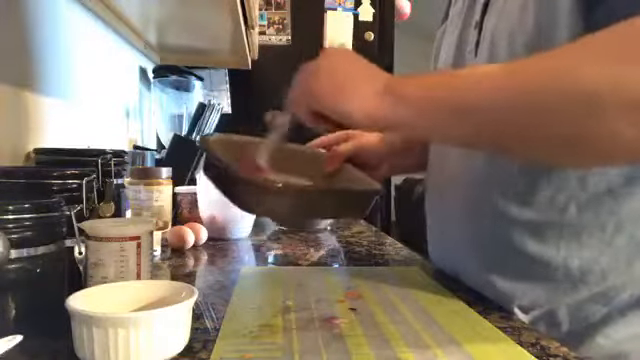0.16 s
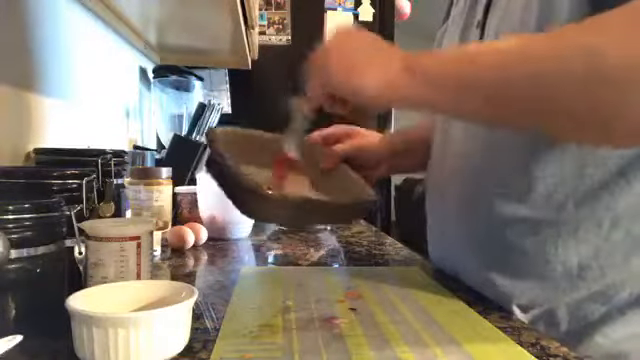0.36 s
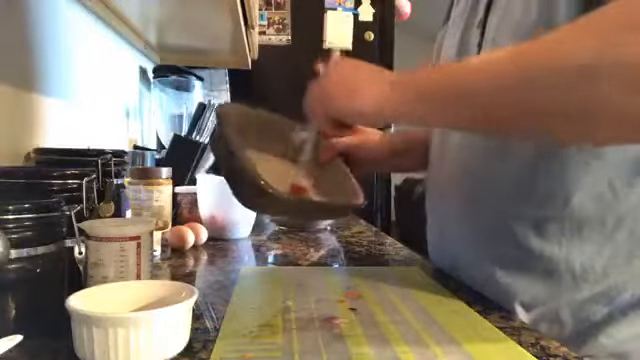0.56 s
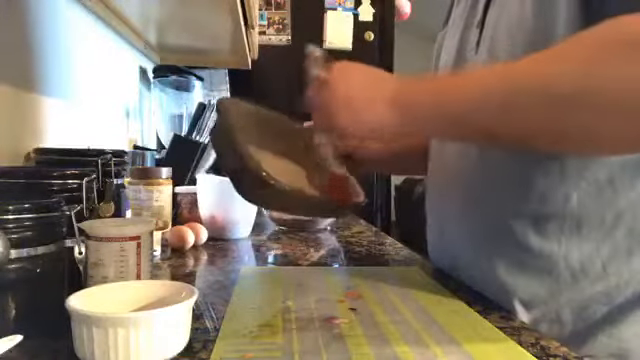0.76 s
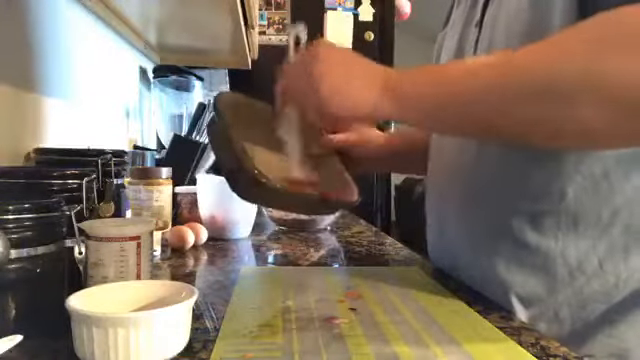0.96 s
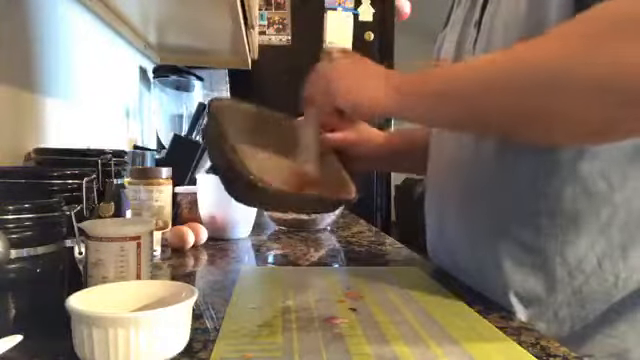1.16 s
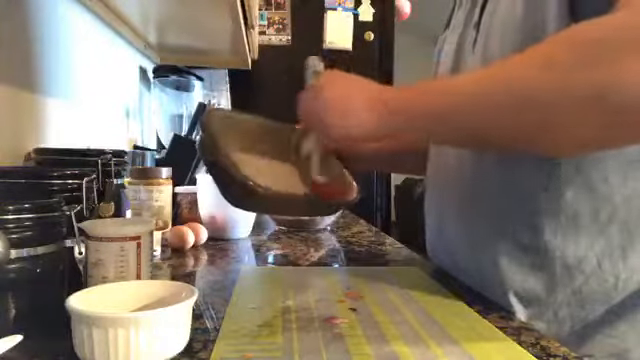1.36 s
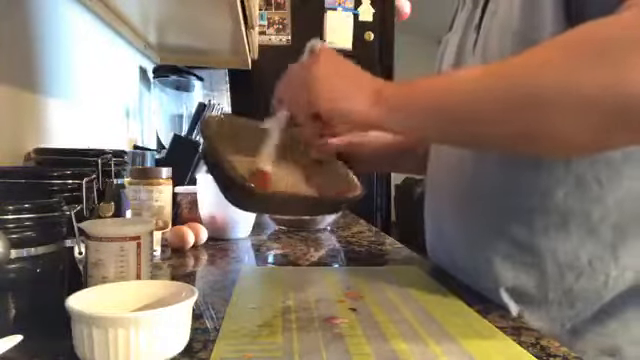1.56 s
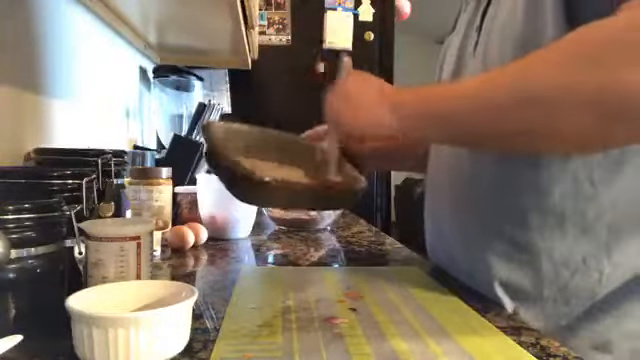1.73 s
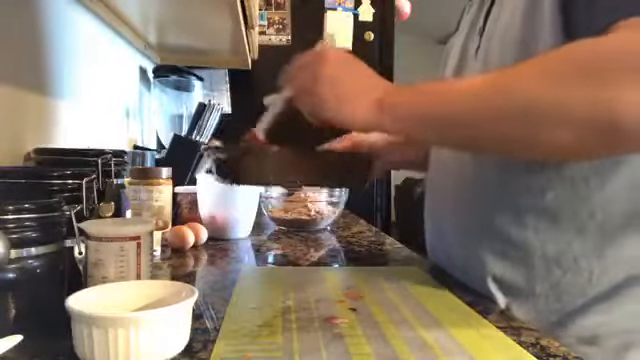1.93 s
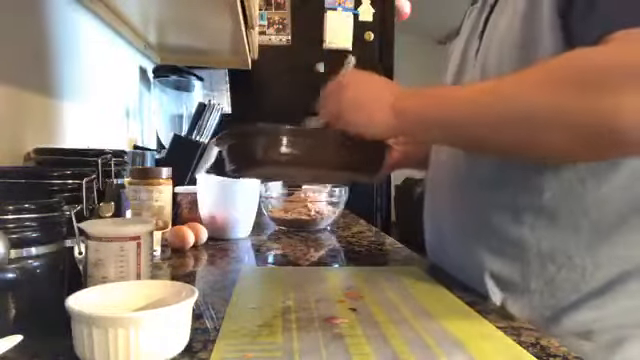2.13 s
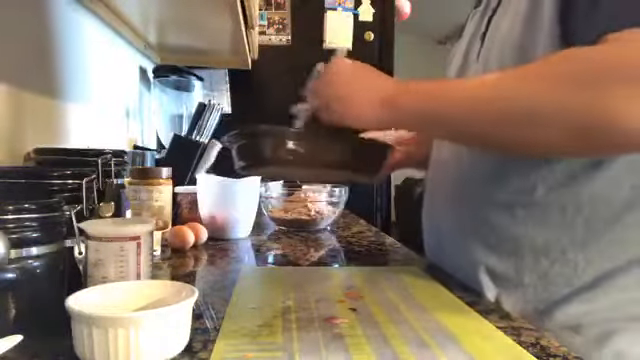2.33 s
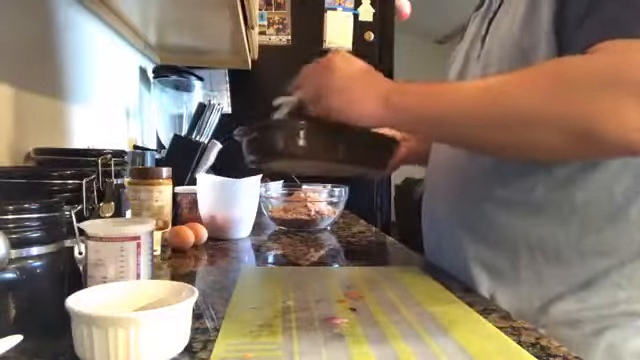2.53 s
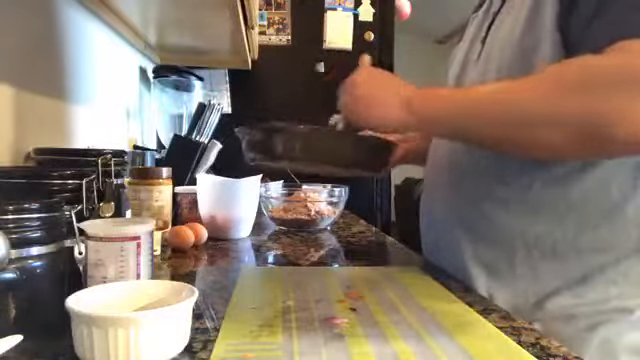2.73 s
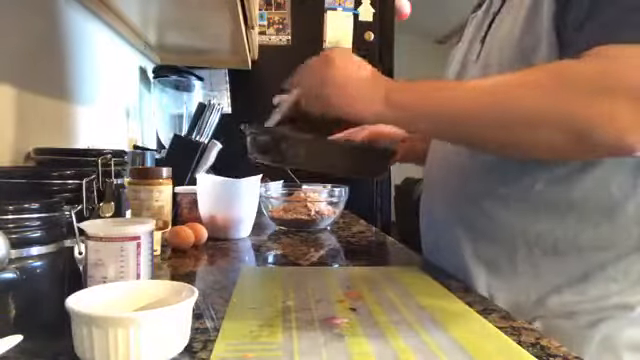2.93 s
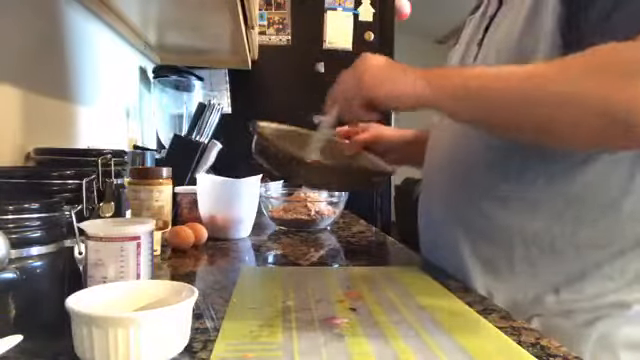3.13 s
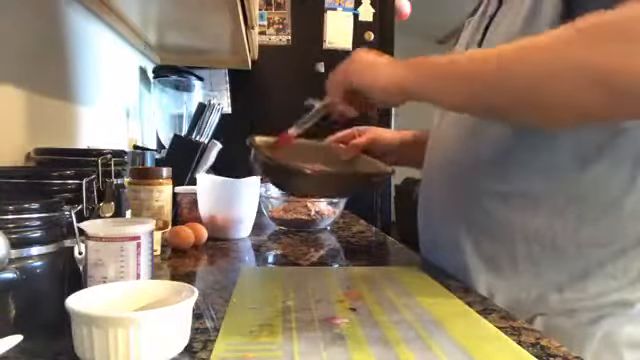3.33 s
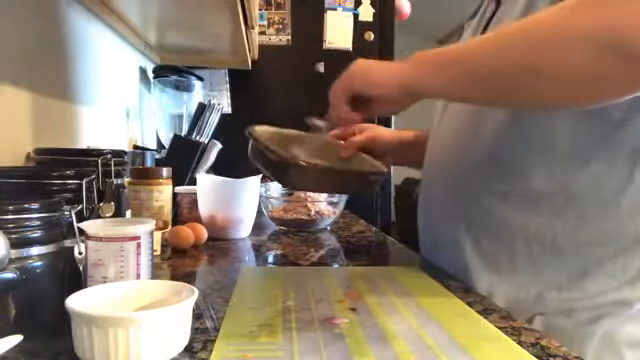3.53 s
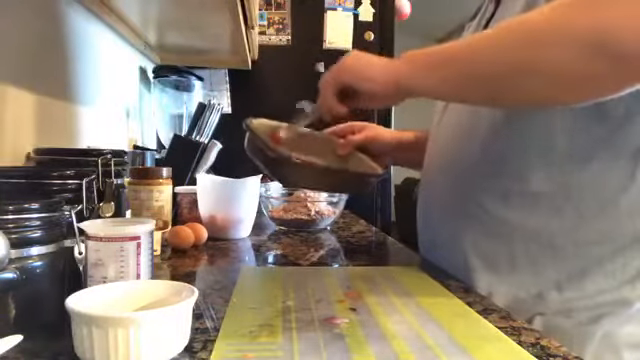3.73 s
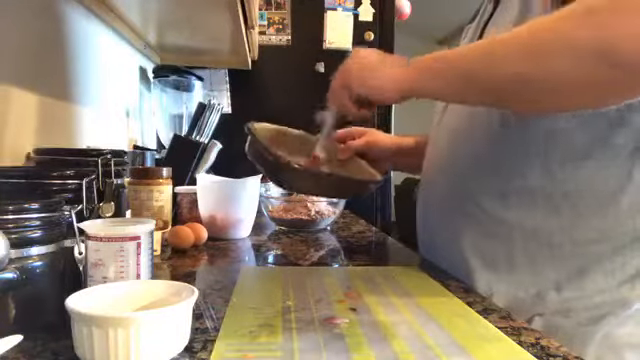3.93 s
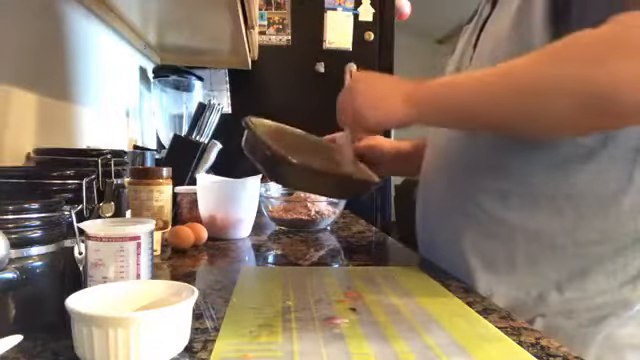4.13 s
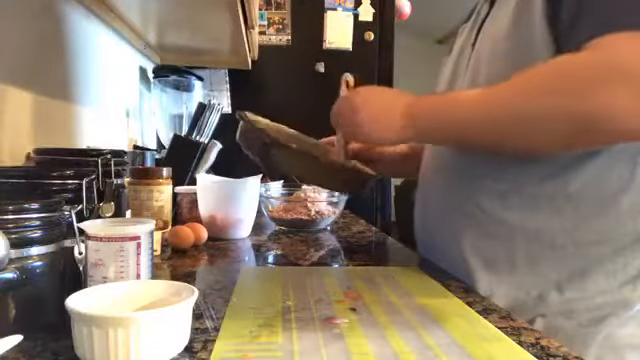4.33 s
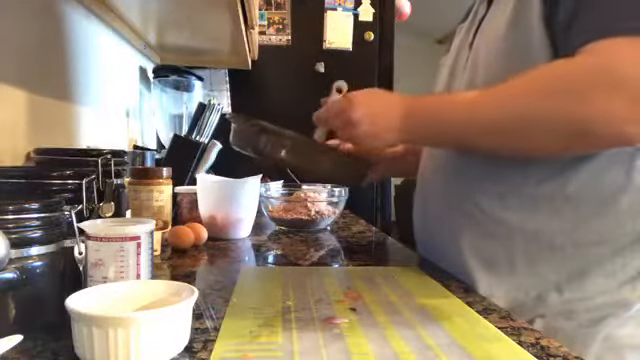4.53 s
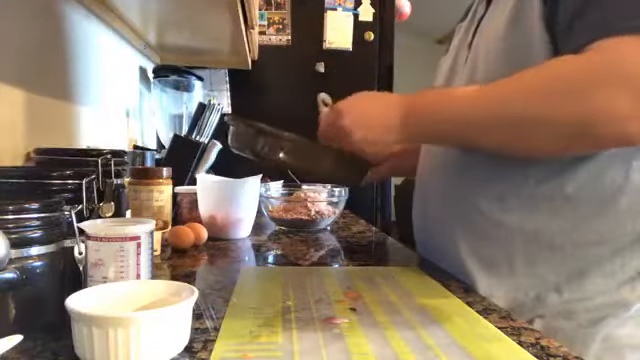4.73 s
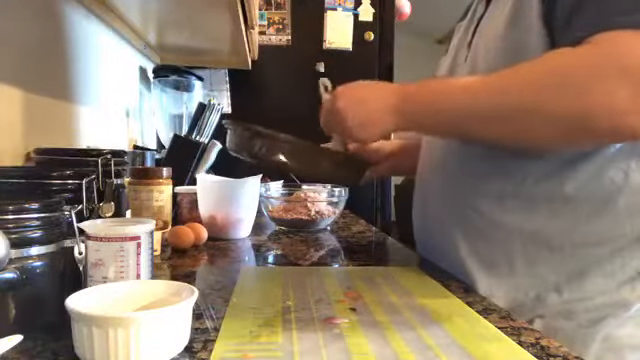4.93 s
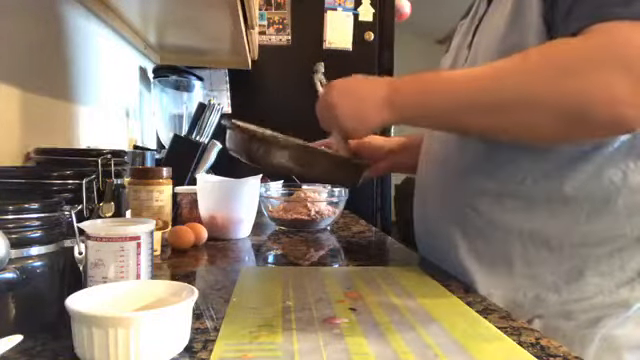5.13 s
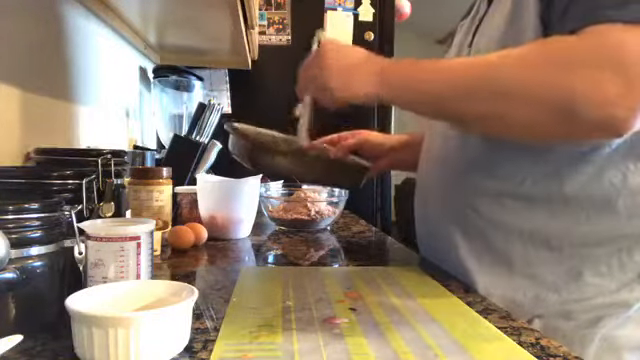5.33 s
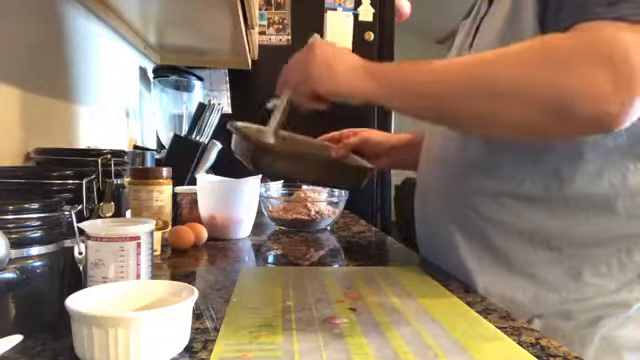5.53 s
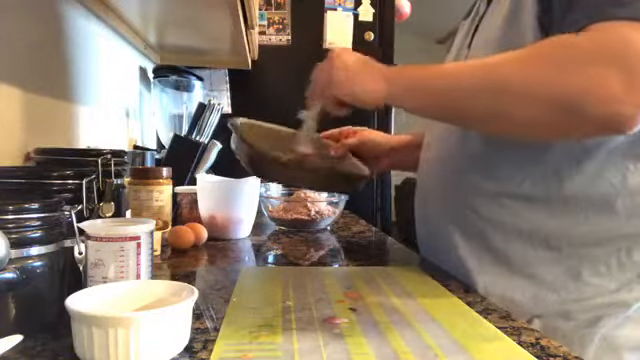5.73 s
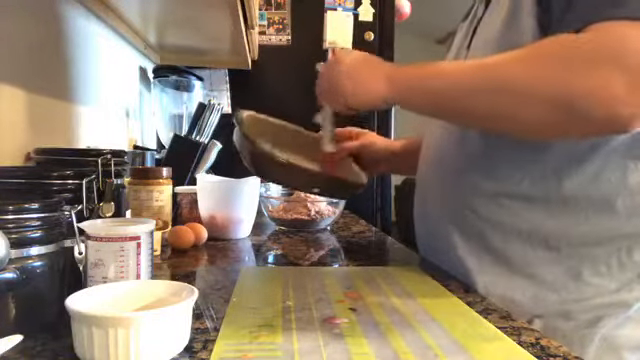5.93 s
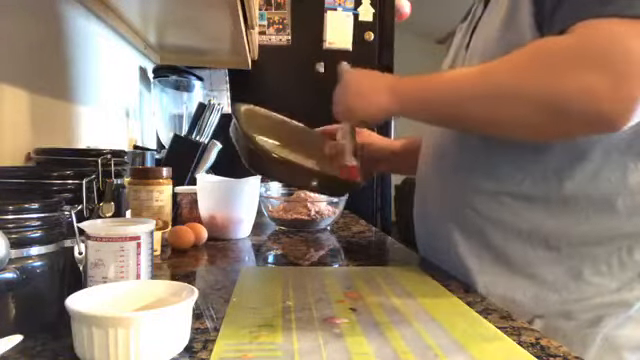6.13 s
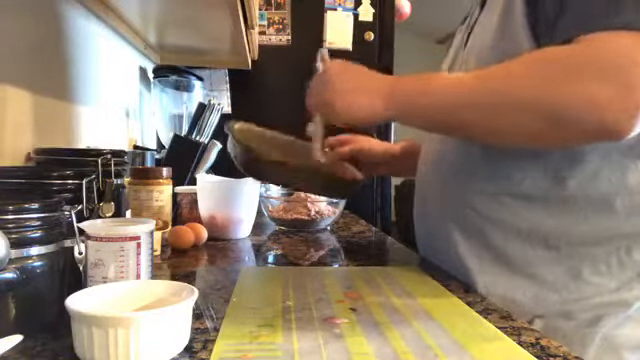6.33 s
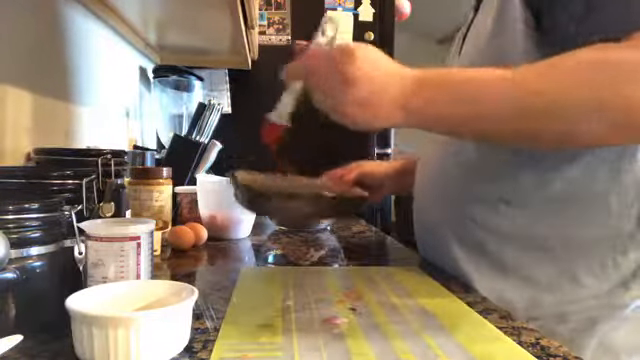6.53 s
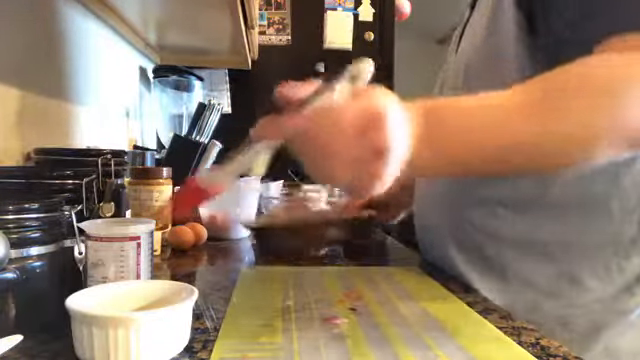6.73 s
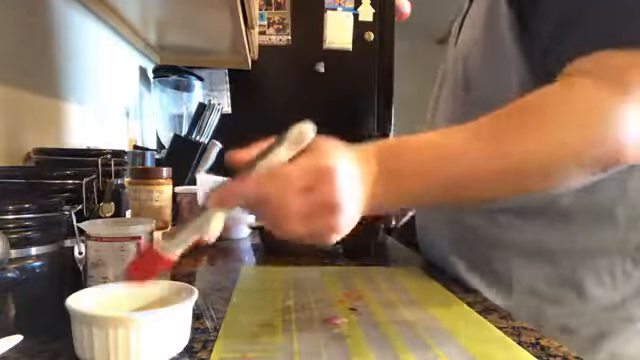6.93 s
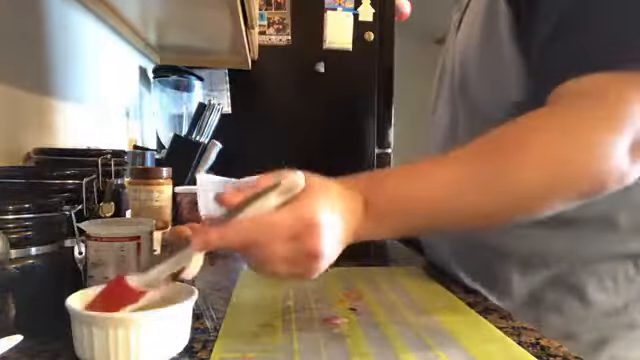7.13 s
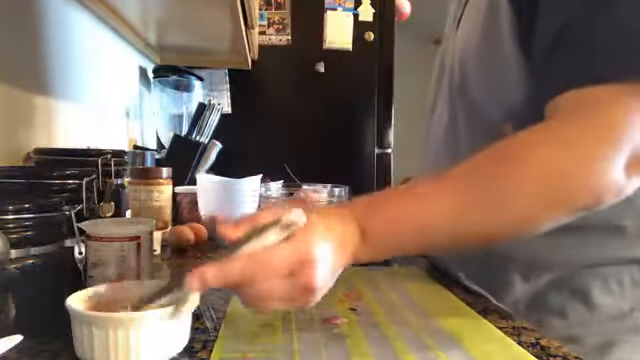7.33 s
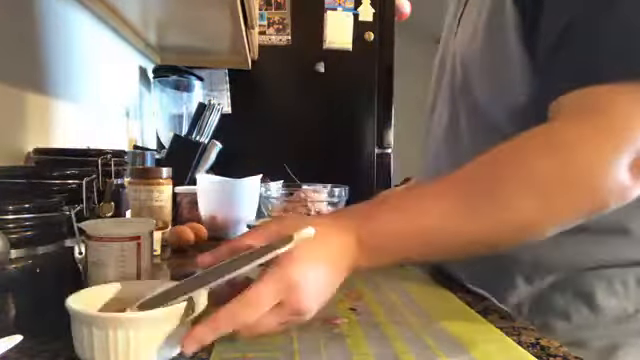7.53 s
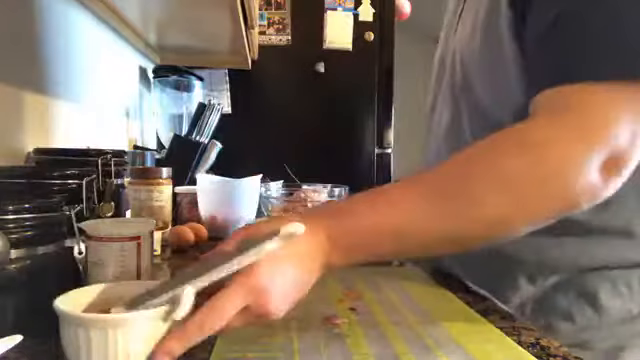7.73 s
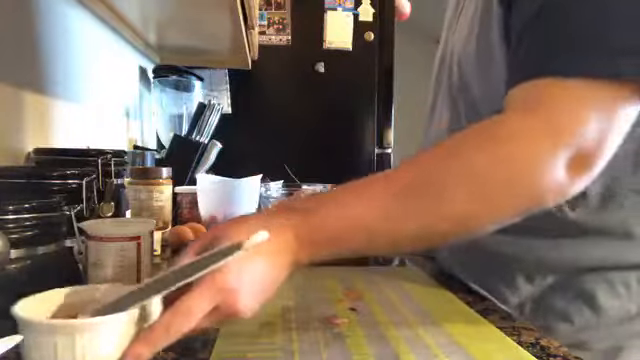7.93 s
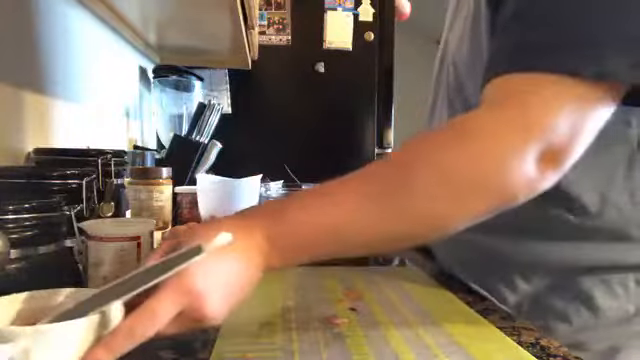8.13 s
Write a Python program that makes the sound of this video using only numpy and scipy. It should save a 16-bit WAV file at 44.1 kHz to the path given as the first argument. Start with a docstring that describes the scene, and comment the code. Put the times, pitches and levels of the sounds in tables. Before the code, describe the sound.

Quick, light brush strokes grease a baking pan in a kitchen, before the pan is set down with a clatter and a ramekin slides.

```python
"""Greasing a baking pan

A small kitchen with a low hum, one microphone close to the work, a little echo off the cupboards.
A silicone brush hisses over a hand-held pan in quick light strokes and two slow rubs; the grease
crackles and the pan rings faintly. Set on the stone counter, the pan clacks, bounces and settles.
The brush is laid on a ramekin, which scrapes over the stone as it is pushed aside."""
import sys
import numpy as np
from scipy import signal
from scipy.fft import rfft, irfft, next_fast_len
from scipy.io import wavfile

SR = 44100
rng = np.random.default_rng(int(sys.argv[2]) if len(sys.argv) > 2 else 0)


def transcribe(signal):
    """Save signal, clipped to [-1, 1], as a 16-bit WAV file at the path in sys.argv[1]."""
    frames = np.atleast_2d(signal).T
    limited = np.clip(frames, -1, 1)
    pcm = np.round(limited * 32767).astype(np.int16)
    wavfile.write(sys.argv[1], SR, pcm)


N = 364693
TIME = np.arange(N) / SR

# room tone: frequency_hz, density_db
ROOM_SPECTRUM = [(25, -14.5), (45, -2), (65, 5), (105, 1), (200, -11.5), (350, -9.5), (750, -17),
                 (1500, -19.5), (2200, -21), (4000, -25), (7300, -27), (9000, -33.5), (16000, -34)]
# faint wavering tones in the room: start_s, end_s, pitch_hz, level_db
ROOM_TONES = [(4.957, 5.093, 566, -70.5), (5.61, 6.067, 567, -72.5)]
# sweeps of the brush: start_s, length_s, level_db, brightness_db, pan_ring_db
BRUSH_STROKES = [(-.06, 0.091, -55.5, 2, -63), (0.041, 0.046, -69, -22, -62), (0.184, 0.16, -57, 8.5, -71),
                 (0.495, 0.3, -56.5, -4.5, -64.5), (0.908, 0.15, -57.5, 1, -63),
                 (1.159, 0.2, -52.5, 3.5, -63), (1.341, 0.29, -58.5, 1.5, -74.5),
                 (1.61, 0.19, -58.5, -2, -75.5), (1.787, 0.11, -59, -6.5, -69),
                 (2.052, 0.21, -62, 2, -66.5), (2.38, 0.11, -64.5, 3, -64.5),
                 (2.567, 0.21, -59.5, 0.5, -66), (2.776, 0.16, -56.5, -1.5, -63.5),
                 (3.03, 0.22, -61, -2, -82), (3.469, 0.17, -58.5, -9.5, -71), (3.76, 0.13, -54, -2.5, -78),
                 (4.018, 0.27, -61.5, -4.5, -77), (4.243, 0.28, -65.5, -5, -75.5),
                 (4.648, 0.2, -60, 2, -73), (4.908, 0.17, -59.5, -3, -70.5),
                 (5.103, 0.27, -62.5, 1.5, -75.5), (5.43, 0.15, -69.5, -15, -85),
                 (5.654, 0.32, -66, -10, -70.5), (6.05, 0.18, -58, -1.5, -65), (6.31, 0.052, -71, 3.5, -76)]
# swish of the bristles: frequency_hz, density_db
BRISTLE_SPECTRUM = [(400, 0.5), (900, -2.5), (1800, -5.5), (2800, -2), (4000, 2), (6000, 2.5), (8500, 0),
                    (12000, -1), (16000, -5)]
# the pan's ringing modes: pitch_hz, struck_db, brushed_db
PAN_MODES = [(355, -29.5, -16.5), (1087, -20.5, -34), (1384, -17.5, -8), (2180.6, -8.5, -12),
             (2232, -17.5, -3.5), (2590, -38, -2.5), (3370, -33.5, -5.5), (3582, -16, -14),
             (3655, -18.5, -0.5), (5200, -25, -7.5), (7230, -21.5, -8)]
# the brush grazing the rim: start_s, level_db, pitch_hz
RIM_GRAZES = [(.046, -60, 3450), (2.098, -65, 3410), (5.338, -66, 3710), (5.445, -66, 3400)]
# bristles flicking free: start_s, level_db, centre_hz, length_s
BRISTLE_FLICKS = [(0.052, -61, 4380, 0.0076), (.893, -54, 5800, 0.0049), (1.214, -45.5, 7300, 0.018),
                  (1.276, -45.5, 11600, 0.016), (1.309, -50, 8000, 0.019), (1.731, -59, 3870, 0.0071),
                  (2.55, -65, 3000, 0.033), (2.67, -55.5, 10000, .018), (3.528, -49, 6760, 0.042),
                  (3.766, -59.5, 5700, 0.021), (3.828, -55.5, 8500, 0.014), (4.19, -58.5, 4500, 0.016),
                  (4.973, -58, 8000, 0.015), (5.133, -63.5, 5800, .009), (5.206, -57, 6900, 0.016)]
# touches that catch one mode of pan, ramekin or counter: start_s, pitch_hz, level_db, t60_s
MODE_CLINKS = [(0.893, 1395, -57.5, 0.59), (1.199, 1380, -60.5, 0.66), (6.857, 4760, -54, 0.51),
               (7.091, 350, -38, 0.12), (7.193, 350, -34, 0.1), (7.3742, 2626, -35.5, 0.052),
               (7.585, 4730, -35, 0.074), (7.586, 2220, -31.5, 0.073), (7.59, 155, -36, 0.13)]
# slow, soft rubs on the pan: start_s, end_s, level_db
SLOW_RUBS = [(3.21, 3.802, -67.5), (4.44, 4.798, -71.5)]
# resonances of the rubbing: pitch_hz, level_db, t60_s
RUB_MODES = [(862, -2, 0.13), (1180, 2.5, 0.018), (1453, -3, 0.078)]
# the pan meeting the counter: start_s, strength_db, sharpness_hz, free_ring_db, first_flight_s
PAN_LANDINGS = [(6.77, -47.5, 3470, 13.5, 0.015), (6.791, -5.5, 3360, 1.5, 0.017),
                (6.8565, -5, 2250, -2, 0.027), (7.0899, -23, 705, -5.5, .018),
                (7.191, -24.5, 965, 1.5, 0.02), (7.237, -31, 776, -18, .012),
                (7.5849, -13, 1878, -8.5, 0.0088)]
# dead clack of pan and counter together: pitch_hz, level_db, t60_s
CLACK_MODES = [(92, -35.5, 0.25), (363.4, -17, 0.038), (877, 2.5, 0.014), (1115, 4.5, 0.0094),
               (1402, 0, 0.028), (1730, -2.5, 0.006), (3370, -8, .012)]
# dense ringing of pan and counter after a knock: frequency_hz, density_db, t60_s
RATTLE_BANDS = [(50, -10, 0.28), (99, -1.5, 0.29), (188, -18, 0.75), (350, -9.5, 0.37), (889, 0, 0.15),
                (1410, 4, 0.11), (2710, -3, 0.23), (4340, -27, 0.3), (8000, -3.5, 0.15), (15000, 3, 0.23)]
# knocks on the ramekin: start_s, strength_db, sharpness_hz
RAMEKIN_TOUCHES = [(7.3734, -42.5, 2480), (8.017, -33.5, 8400), (8.0673, -39.5, 8200), (8.105, -77, 9000),
                   (8.255, -51.5, 5000)]
# the ramekin with the brush lying on it: pitch_hz, level_db, t60_s
RAMEKIN_MODES = [(157, -20, 0.18), (241, -4, 0.095), (457, -1.5, 0.04), (816, -1, 0.022), (1247, 2, 0.052),
                 (1645, 0.5, 0.0085), (2290, 1.5, 0.019), (2690, -1.5, 0.035), (3800, -0.5, 0.0086)]
# loudness of the sliding ramekin: time_s, level_db
SLIDE_LEVELS = [(7.6, -97.5), (7.7, -60.5), (7.82, -80.5), (7.89, -66), (7.98, -69.5), (8.05, -55.5),
                (8.15, -62), (8.27, -61)]
# its foot scraping the stone: frequency_hz, density_db
SLIDE_SPECTRUM = [(200, -5.5), (750, -4.5), (1300, 4), (2000, -5.5), (3600, -7), (7000, -15.5),
                  (15000, -21.5)]

ROOM_DB, HUM_HZ, HUM_DB = -65, 120, -70.5
SPEED_BRIGHTENS_DB = 6  # mid-stroke against the turning points
CRACKLE_PER_S, CRACKLE_DB, CRACKLE_CYCLES = 220, -11, 13  # level relative to the swish
TAP_DB, TAP_LENGTH_S = -64.5, 0.0087  # a flick this long taps the pan this hard; slower ones tap less
HELD_T60_S, FREE_T60_S = 0.1, 0.27  # the pan's ring in the hand, and set down
PAN_LOSS_HZ = 5500  # a free mode this high rings half as long
BOUNCE_LOSS_DB, BOUNCE_FREES_DB = 11.5, 4.5  # first bounce: weaker, but ringing more freely
BOUNCE_DULLING, BOUNCE_QUICKENS = 0.7, 0.64  # share of sharpness and flight time each bounce keeps
CUTOFF_HZ = 15800


def from_db(db):
    """Decibels to gain."""
    return np.exp(np.asarray(db) * (np.log(10) / 20))


def rms_one(x):
    """Scale to rms 1."""
    return x / np.sqrt(np.mean(x ** 2) + 1e-20)


def add(out, start_s, sound):
    """Mix a sound in at its start time."""
    at = int(np.clip(start_s * SR, 0, N - 1))
    out[at:at + len(sound)] += sound[:N - at]


def at_hz(spectrum, hz, column=1):
    """One column of a spectrum, read on a log-frequency axis."""
    table = np.array(spectrum)
    return np.interp(np.log(np.maximum(hz, 1)), np.log(table[:, 0]), table[:, column])


def butter(x, hz, kind, order=2):
    """Causal Butterworth filter."""
    sections = signal.butter(order, np.clip(hz, 10, .47 * SR), kind, fs=SR, output="sos")
    return signal.sosfilt(sections, x + 1e-18)


def coloured(x, spectrum):
    """Give a steady noise a spectrum; rms 1."""
    size = next_fast_len(N)
    gain = from_db(at_hz(spectrum, np.arange(size // 2 + 1) * SR / size))
    return rms_one(irfft(rfft(x, size) * gain, size)[:N])


def drift(rate_hz):
    """Slow random wander with spread 1, drawn at every 20th sample."""
    slow = butter(rng.standard_normal((N + SR) // 20), 20 * rate_hz, "low")[SR // 20:]
    return np.interp(np.arange(N) / 20, np.arange(len(slow)), rms_one(slow))


def blur(x, smear_s, rate_hz):
    """A shifting grip or contact makes pitches waver, the high ones most."""
    return np.interp(TIME + smear_s * drift(rate_hz), TIME, x)


def hump(start, end, taper):
    """Swell and fade of one movement; the smaller the taper, the flatter its top."""
    count = max(int((end - start) * SR), 2)
    return np.sin(np.pi * (np.arange(count) + .5) / count) ** taper


def burst(length_s):
    """Envelope of a brief touch: a quick rise and a slower fall."""
    age = 2 * TIME[:SR // 5] / length_s
    return age * np.exp(1 - age)


def contact(sharp_hz):
    """Force pulse of one touch: the softer, the duller."""
    return butter(signal.unit_impulse(SR // 50), sharp_hz, "low", order=3)


def friction(per_s, grain_db):
    """Countless tiny slips merge into a hiss; a few larger ones stand out."""
    slips = (rng.random(N) < per_s / SR) * rng.standard_normal(N)
    return rms_one(rng.standard_normal(N) + from_db(grain_db) * rms_one(slips))


def ring(x, hz, t60):
    """One mode: a unit click sets a sine of height 1 ringing."""
    radius, angle = from_db(-60 / (t60 * SR)), 2 * np.pi * hz / SR
    return signal.lfilter([0, np.sin(angle)], [1, -2 * radius * np.cos(angle), radius ** 2], x + 1e-18)


def resonate(force, modes):
    """A body's modes answer one force with alternating signs."""
    return sum((-1) ** k * from_db(db) * ring(force, hz, t60) for k, (hz, db, t60) in enumerate(modes))


def with_tail(x, t60, wet_db):
    """A sound followed by a dense, slightly dull tail."""
    t = TIME[:SR // 2]
    tail = rng.standard_normal(len(t)) * from_db(-60 * t / t60)
    tail = butter(tail, 3400, "low", order=1)
    return x + from_db(wet_db) * signal.fftconvolve(x, tail / np.linalg.norm(tail))[:N]


def room_tone(waver_db, wobble):
    """All around the microphone: rumble and hiss, an appliance's wavering hum and two faint tones."""
    out = from_db(ROOM_DB) * coloured(rng.standard_normal(N), ROOM_SPECTRUM)
    out += from_db(HUM_DB + waver_db * drift(4)) * np.sqrt(2) * np.sin(2 * np.pi * HUM_HZ * TIME)
    wavering_time = np.cumsum(1 + wobble * drift(13)) / SR
    for start, end, hz, db in ROOM_TONES:
        swell = np.zeros(N)
        add(swell, start, from_db(db) * hump(start, end, taper=0.14))
        out += swell * np.sin(2 * np.pi * hz * wavering_time)
    return out


def stroke_envelopes(taper, spill_s):
    """Gains of dull hiss, bright hiss and drive on the pan: a stroke is brightest where it is fastest."""
    dull, bright, press = np.zeros((3, N))
    for start, length, db, bright_db, ring_db in BRUSH_STROKES:
        # the outer bristles touch a little before the tuft and leave a little after it
        start, end = start - spill_s, start + length + spill_s
        speed = hump(start, end, taper)[max(0, int(-start * SR)):]
        tilt_db = bright_db + SPEED_BRIGHTENS_DB * (speed - 1)
        add(dull, start, speed * from_db(db - tilt_db / 2))
        add(bright, start, speed * from_db(db + tilt_db))
        add(press, start, speed * from_db(ring_db))
    return dull, bright, press


def tuft_hiss(flutter_db):
    """Ever different tufts take the load, so each third of an octave in the treble flutters by itself."""
    edges_hz = 1400 * 2 ** (np.arange(12) / 3)
    slips = [friction(per_s=550, grain_db=-7) for _ in range(2)]
    out = butter(slips[1], edges_hz[0], "low")
    for k, band in enumerate(zip(edges_hz, edges_hz[1:])):
        out += butter(slips[k % 2], band, "band") * from_db(flutter_db * drift(60))
    return out


def grease_crackle(spread_db, low_hz, high_hz, pitch_count):
    """Threads of grease snap between the bristles: tiny pops of varied pitch and size; rms 1."""
    snaps = rng.random(N) < CRACKLE_PER_S / SR
    pops = snaps * from_db(spread_db * np.minimum(rng.exponential(1, N), 3))
    pitch_index = rng.integers(0, pitch_count, N)
    return rms_one(sum((-1) ** k * ring(pops * (pitch_index == k), hz, CRACKLE_CYCLES / hz)
                       for k, hz in enumerate(np.geomspace(low_hz, high_hz, pitch_count))))


def brush(swish_db, flutter_db, roam_db):
    """Greasy bristles drag unevenly; they hiss and set the pan's modes singing."""
    dull, bright, press = stroke_envelopes(taper=1.93, spill_s=0.016)
    flutter = from_db(flutter_db * drift(53))
    hiss = flutter * coloured(tuft_hiss(flutter_db=2.5), BRISTLE_SPECTRUM)
    hiss += from_db(CRACKLE_DB) * grease_crackle(spread_db=5, low_hz=4500, high_hz=13700, pitch_count=13)
    lows = butter(hiss, 5600, "low", order=1)
    swish = from_db(swish_db) * (dull * lows + bright * (hiss - lows))
    taps = np.zeros(N)
    for start, _, _, length in BRISTLE_FLICKS:
        add(taps, start, from_db(TAP_DB) * TAP_LENGTH_S / length * contact(sharp_hz=3200))
    unit_drive = np.sqrt(4 * np.log(1000) / (HELD_T60_S * SR))  # noise this strong rings a mode at rms 1
    force = taps + press * friction(per_s=560, grain_db=-5) * unit_drive
    # as the brush roams over the pan it passes the nodes and bellies of each mode
    singing = sum(ring(force * from_db(db + roam_db * drift(2.2)), hz, HELD_T60_S)
                  for hz, _, db in PAN_MODES)
    return swish + blur(singing, smear_s=2e-5, rate_hz=30)


def rim_grazes(length_s, scratch_db):
    """The brush scratches along the rim, which answers with a quickly damped note."""
    out = np.zeros(N)
    for start, db, hz in RIM_GRAZES:
        scratch = butter(rng.standard_normal(SR // 5), [hz / 2, hz * 2], "band")
        note = rms_one(ring(scratch, hz, t60=0.04))
        add(out, start, from_db(db) * burst(length_s) * (note + from_db(scratch_db) * rms_one(scratch)))
    return out


def bristle_flicks():
    """A bent tuft springs free with a short squelch."""
    out = np.zeros(N)
    for start, db, hz, length in BRISTLE_FLICKS:
        spray = rms_one(butter(rng.standard_normal(SR // 5), [hz / 1.54, hz * 1.4], "band"))
        add(out, start, from_db(db) * spray * burst(length))
    return out


def clinks(rise_s):
    """A touch at the right spot makes one mode ring out briefly: a rough ping, or a low thud."""
    out, t = np.zeros(N), TIME[:SR // 2]
    attack = 1 - np.exp(-(t / rise_s) ** 2)
    for start, hz, db, t60 in MODE_CLINKS:
        add(out, start, from_db(db) * attack * ring(signal.unit_impulse(len(t)), hz, t60))
    return blur(out, smear_s=2e-5, rate_hz=130)


def rubbing():
    """Rubber dragged slowly over the pan sticks and slips with a soft, hollow rasp."""
    swell = np.zeros(N)
    for start, end, db in SLOW_RUBS:
        add(swell, start, from_db(db) * hump(start, end, taper=1.4))
    return swell * rms_one(resonate(friction(per_s=170, grain_db=-2), RUB_MODES))


def bounces(touches):
    """Each landing starts a dying, quickening run of touches: the forces behind clack and free ring."""
    force, free = np.zeros((2, N))
    for start, db, sharp_hz, ring_db, flight_s in PAN_LANDINGS:
        for k in range(touches):
            pulse = from_db(db - np.sqrt(k) * BOUNCE_LOSS_DB) * contact(sharp_hz * BOUNCE_DULLING ** k)
            add(force, start, pulse)
            add(free, start, pulse * from_db(ring_db + np.sqrt(k) * BOUNCE_FREES_DB))
            start += flight_s * BOUNCE_QUICKENS ** k
    return force, free


def disperse(x, hz, width_hz):
    """Bending waves travel slower at low pitch: two allpasses smear a click into a short falling chirp."""
    radius = np.exp(-np.pi * width_hz / SR)
    poles = [1, -2 * radius * np.cos(2 * np.pi * hz / SR), radius ** 2]
    return signal.lfilter(poles[::-1], poles, signal.lfilter(poles[::-1], poles, x))


def rattle(force, build_s, step_hz=210, beat_hz=55):
    """Pan and counter ring up and die away: crowded like noise lower down, separate overtones above."""
    t, response = TIME[:SR], np.zeros(SR)
    white = rng.standard_normal((2, SR))
    edges_hz = 40 * 2 ** (np.arange(14) / 2)

    def decay(hz):
        return from_db(at_hz(RATTLE_BANDS, hz) - 60 * t / at_hz(RATTLE_BANDS, hz, column=2))

    for k, (low, high) in enumerate(zip(edges_hz, edges_hz[1:])):
        response += decay(np.sqrt(low * high)) * butter(white[k % 2], [low, high], "band", order=3)
    # a plate's overtones lie at roughly even steps, in close pairs that beat
    for slot_hz in np.arange(edges_hz[-1], CUTOFF_HZ, step_hz):
        hz = slot_hz + step_hz * rng.random()
        strength = 2 * np.sqrt(step_hz / SR) * rng.standard_normal()
        beat = np.sqrt(2) * np.cos(2 * np.pi * (beat_hz * rng.random() * t + rng.random()))
        response += strength * decay(hz) * beat * np.sin(2 * np.pi * hz * t)
    return signal.fftconvolve(force, response * (1 - np.exp(-t / build_s)))[:N]


def pan_set_down(rattle_db):
    """The pan lands edge after edge; each touch clacks, and rings as far as the hand lets it."""
    force, free = bounces(touches=4)
    clack = disperse(resonate(force, CLACK_MODES), hz=830, width_hz=840)
    free_modes = [(hz, db, FREE_T60_S / (1 + (hz / PAN_LOSS_HZ) ** 2)) for hz, db, _ in PAN_MODES]
    return clack + resonate(free, free_modes) + from_db(rattle_db) * rattle(free, build_s=0.0017)


def ramekin_knocks(crack_db, counter_db):
    """The brush handle drops on the ramekin's rim, and the ramekin is nudged."""
    force = np.zeros(N)
    for start, db, sharp_hz in RAMEKIN_TOUCHES:
        add(force, start, from_db(db) * contact(sharp_hz))
    # the unglazed foot gives each knock a short gritty crack; the counter answers only in the low range
    crack = from_db(crack_db) * with_tail(force, t60=0.074, wet_db=17.5)
    counter = from_db(counter_db) * rattle(butter(force, 950, "low"), build_s=0.0014)
    return resonate(force, RAMEKIN_MODES) + crack + counter


def ramekin_slide(singing_db, judder_db):
    """The foot scrapes over the stone and keeps the ramekin's wall singing."""
    level_db = np.interp(TIME, *np.transpose(SLIDE_LEVELS))
    slips = friction(per_s=300, grain_db=-18)
    singing = from_db(singing_db) * rms_one(ring(slips, hz=2650, t60=0.046))
    return from_db(level_db + judder_db * drift(40)) * (coloured(slips, SLIDE_SPECTRUM) + singing)


def scene():
    """The work close up in mono, with the short echo of cupboards and walls and the room tone behind."""
    close = brush(swish_db=-1.5, flutter_db=0.6, roam_db=3.5)
    close += rim_grazes(length_s=0.032, scratch_db=-6) + bristle_flicks()
    close += clinks(rise_s=0.0012) + rubbing()
    close += pan_set_down(rattle_db=-2)
    close += ramekin_knocks(crack_db=-0.5, counter_db=9.5) + ramekin_slide(singing_db=-6.5, judder_db=2)
    return (with_tail(close, t60=0.66, wet_db=-22.5) + room_tone(waver_db=2, wobble=0.016))[None]


def record(dry):
    """The recorder rounds the loudest peaks and cuts the top steeply."""
    ceiling = 0.9
    top_cut = signal.ellip(10, .1, 70, CUTOFF_HZ, fs=SR, output="sos")
    return signal.sosfilt(top_cut, ceiling * np.tanh(dry / ceiling))


dry = scene()
out = record(dry)
transcribe(out)
```